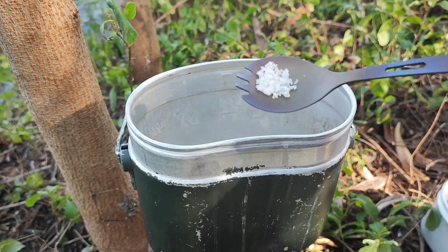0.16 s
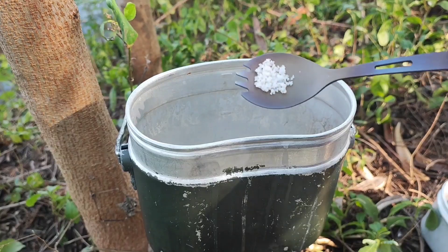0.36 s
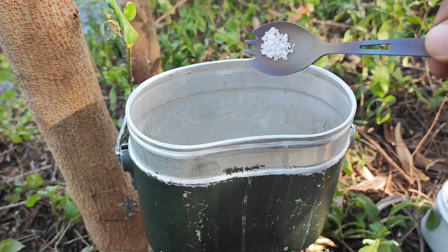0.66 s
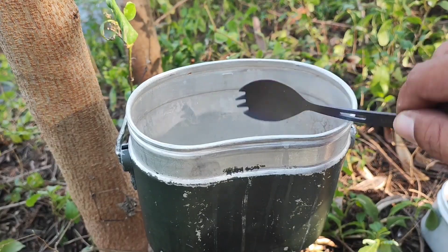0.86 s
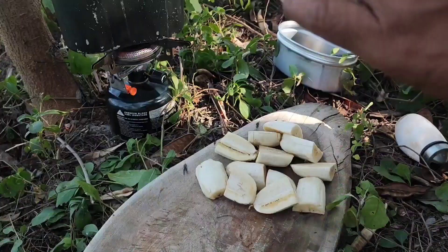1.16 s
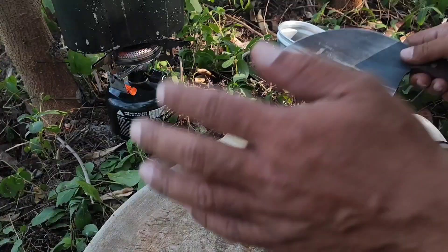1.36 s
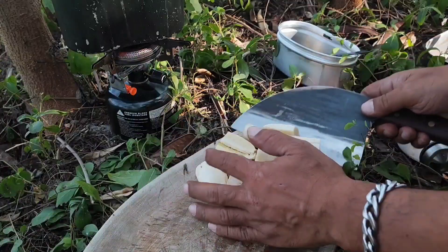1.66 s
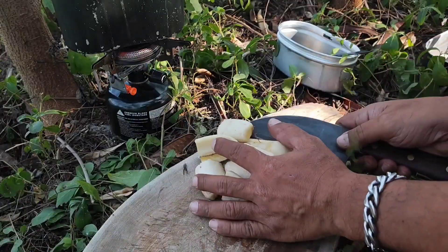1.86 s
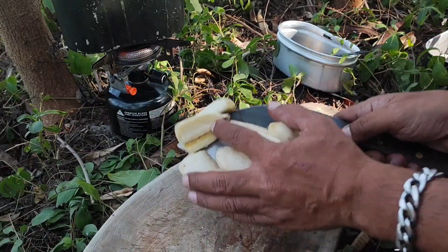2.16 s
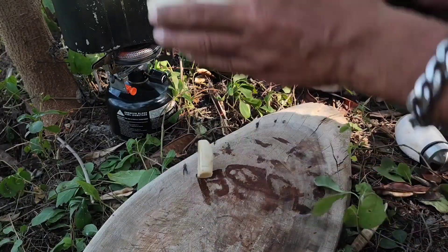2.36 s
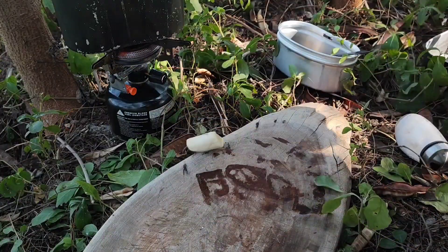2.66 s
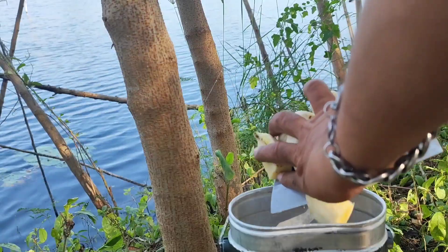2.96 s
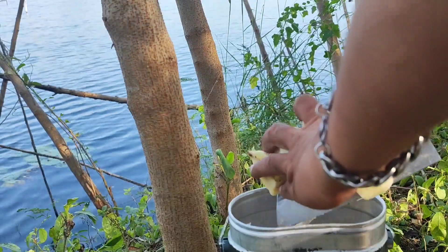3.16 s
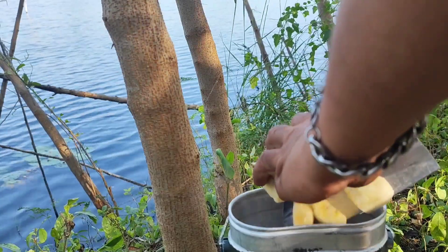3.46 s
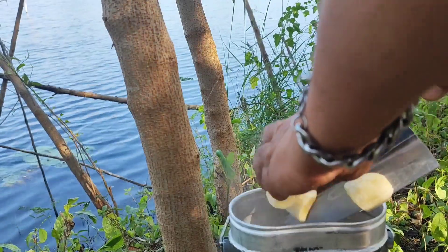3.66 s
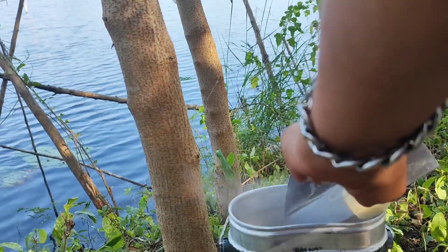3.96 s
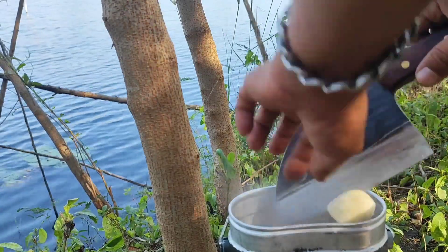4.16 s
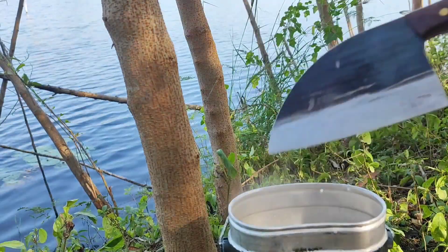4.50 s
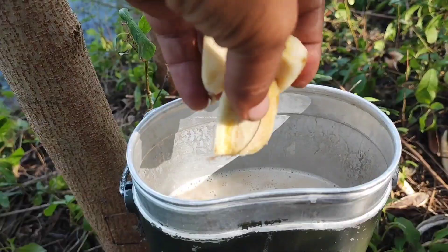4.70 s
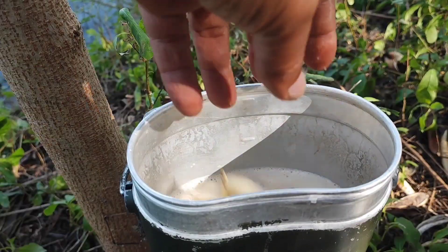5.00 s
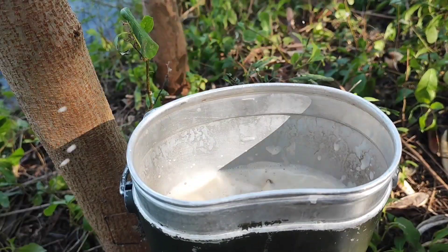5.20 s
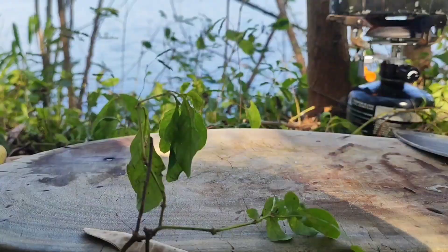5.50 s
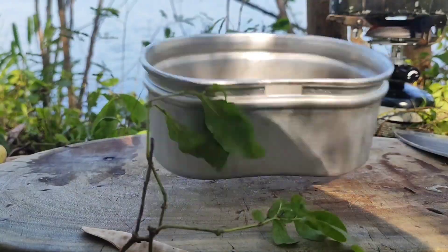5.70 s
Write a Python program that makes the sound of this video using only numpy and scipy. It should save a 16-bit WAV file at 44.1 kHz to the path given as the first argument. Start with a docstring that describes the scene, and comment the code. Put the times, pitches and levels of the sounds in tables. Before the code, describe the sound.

Outdoors with insects and a hissing camp stove, water simmers, a blade knocks and scrapes wood, pieces splash in, and a metal tin lands.

```python
"""Lakeside camp, heard from five spots in turn. A gas stove roars, hisses and, at one spot, hums.
Simmer bubbles ring a mess tin; a spork taps its rim. A cleaver knocks and scrapes a ringing board.
Fruit pieces plop into the water, jolting the air column above it and throwing spray.
A second, empty tin lands with a clang and low thuds. Behind: two choruses of clicking insects, wind."""
import sys
import numpy as np
from scipy import signal
from scipy.fft import rfft, irfft
from scipy.io import wavfile
from scipy.ndimage import uniform_filter1d

SR = 44100
rng = np.random.default_rng(int(sys.argv[2]) if len(sys.argv) > 2 else 0)


def pcm_store(signal):
    """Save signal as 16-bit PCM."""
    levels = np.round(np.clip(np.atleast_2d(signal), -1, 1) * 32767)
    wavfile.write(sys.argv[1], SR, levels.astype(np.int16).T)


N = 257544
T = np.arange(N) / SR

# Listening spots: start_s, fade_s, roar_db, roar_db_per_s, simmer_db, simmer_db_per_s, fizz_db, hiss_db,
# whistle_db, low_insects_db, high_insects_db, wind_db, low_insects_hz, high_insects_hz
LISTENING_SPOTS = [(0, .01, -49.5, -2, -45.5, -0.3, -62, -68.5, -75, -77.5, -72, -92, 4570, 6715),
                   (1.42, 0.0311, -51, 1.3, -61.5, -1.7, -72, -67.5, -86, -76, -66, -84, 4980, 6500),
                   (2.93, 0.0995, -52, -1.1, -65, -5, -72, -69, -76.5, -73, -75.5, -59, 4845, 6590),
                   (4.79, 0.0896, -47, 1.3, -55, -8.5, -65, -61, -64.5, -68, -63, -63.5, 4670, 6586),
                   (5.68, 0.043, -51, 4, -67, -3, -69.5, -62, -70, -73, -73, -64, 4660, 6570)]
# Flame spectrum: freq_hz, density_db
FLAME_SPECTRUM = [(25, -45), (55, -3), (90, -1), (180, 4), (320, 0.5), (500, -7.5), (850, -11),
                  (1200, -21.5), (2500, -42)]
# Gas jet spectrum: freq_hz, density_db
JET_SPECTRUM = [(3000, -17.5), (5500, -3), (7000, 1), (7900, -10.5), (9000, -5), (10000, -6.5), (11400, -7),
                (12200, -15), (15500, -11.5)]
# Steam spectrum: freq_hz, density_db
STEAM_SPECTRUM = [(700, -3), (1200, -4), (1700, -5), (2400, -3), (3500, -9), (3900, -6.5), (4950, -9),
                  (5400, -8), (6000, -12.5), (7200, -9.5), (8000, -15), (12000, -19)]
# Left-right likeness of the stove noise: freq_hz, correlation
STOVE_CORRELATION = [(60, 0.97), (130, 0.99), (290, 0.97), (640, 0.54), (1410, 0.24), (3100, 0), (6820, 0),
                     (15000, 0.0)]
# Air column and walls of the simmering tin: pitch_hz, width_hz, level_db
SIMMER_MODES = [(634, 60, -5.5), (702, 22, 4.5), (747, 34, -4), (809, 51, -9.5), (902, 36, -11),
                (985, 25.5, -13.5), (1138, 150, -23), (1236, 82, -28.5), (1880, 160, -27), (2117, 41, -23),
                (2215, 60, -26), (2366, 46, -30), (2462, 34, -16)]
# Big bubbles: start_s, level_db
BUBBLES = [(0.049, -41.5), (0.3, -37.5), (0.495, -41), (0.638, -32), (0.866, -35.5), (1.085, -37),
           (1.144, -34), (1.175, -36.5), (1.36, -39)]
# Full tin, struck: pitch_hz, level_db, t60_s
FULL_TIN_MODES = [(331, -18.5, 0.37), (349, -25, 0.15), (624, -14.5, 0.075), (743, 0.5, 0.033),
                  (930, -10.5, 0.035), (1260, -43, 0.15), (2090, -48, .06), (2380, -19.5, 0.068),
                  (2460, -46, 0.045), (2690, -27, .05), (3195, -12, 0.047), (3970, -5.5, 0.025),
                  (4280, -31, .06), (4650, -11.5, 0.069), (5500, -18, 0.038), (7150, -10, .04),
                  (9600, -34, .05), (11000, -30, .03)]
# Empty tin, struck: pitch_hz, level_db, t60_s
EMPTY_TIN_MODES = [(50.4, -26.5, 0.081), (148, -28.5, 0.041), (614, -39, 0.029), (735, -22, 0.068),
                   (940, -10.5, 0.16), (996, -0.5, 0.041), (1417, -23.5, 0.64), (1550, -16, 0.065),
                   (2066, -17, 0.45), (2565, -15.5, 0.08), (3200, -17.5, 0.28), (3550, -17, 0.2),
                   (5100, -18, .1), (5870, -10, 0.11), (7500, -39, 0.034), (9141, -34, .04)]
# Cutting board: pitch_hz, level_db, t60_s
BOARD_MODES = [(268, -11, 0.13), (460, -18, 0.041), (798, 4, 0.068), (1230, -3.5, 0.059), (1420, 8, 0.029),
               (1730, -15, 0.02)]
# Cleaver blade: pitch_hz, level_db, t60_s
BLADE_MODES = [(1780, -5, 0.077), (4350, -14, 0.056), (9700, -20, 0.043), (10400, -18, .04),
               (11900, -22, .03)]
# Spork on the rim, two soft bounces: start_s, ring_db, tick_db, contact_s, pan_db (left minus right)
SPORK_TAPS = [(1.002, -15, -18.5, 0.000052, 1), (1.0115, -19, -40, 0.00018, 5.5),
              (1.034, -23, -64, 0.00033, 1)]
# Cleaver on the board: start_s, ring_db, tick_db, contact_s, pan_db
CLEAVER_KNOCKS = [(1.747, -21, -54, 0.00066, 2.3), (2.05, -55, -54, 0.00037, 2)]
# Empty tin landing: start_s, ring_db, tick_db, contact_s, pan_db
TIN_LANDINGS = [(5.79, -70, -49, .0001, 1), (5.806, -53, -52, 0.000079, 7), (5.819, 0, -27, 0.00021, 0),
                (5.833, -4, -29, 0.000091, 2)]
# Blade along the board: start_s, length_s, judder_db, first_hz, last_hz, boom_db, hiss_db
BLADE_STROKES = [(1.769, 0.1854, -52, 1180, 1402, -39, -60), (1.99, 0.087, -59, 1330, 1434, -53, -67.5)]
# Blade catching on the grain: start_s, level_db, pitch_hz, t60_s
GRAIN_CATCHES = [(1.772, -58, 10450, .04), (1.788, -45, 1190, 0.04), (1.82, -61, 9550, .1),
                 (1.835, -57, 9520, 0.052), (1.871, -49, 1210, .05), (1.881, -47, 1270, .05),
                 (1.881, -49.5, 1760, .04), (1.918, -63, 10200, .06), (1.9242, -41, 1290, 0.046),
                 (1.9245, -50, 1730, .03), (1.943, -41.5, 1260, .06), (1.945, -56, 2400, .03),
                 (2.029, -59, 9640, .04), (2.05, -51, 1427, .04)]
# Board under the sliding blade: pitch_hz, level_db, t60_s
BOOM_MODES = [(444, -3, 0.03), (712, 0.5, 0.07)]
# Scraped dust: freq_hz, density_db
DUST_SPECTRUM = [(1500, -1), (2500, -1), (4000, -3.5), (6000, -7), (10000, -6), (15500, -12)]
# Pieces and drops hitting water: start_s, air_db, air_hz, rise_s, t60_s, splash_db, splash_hz, spray_db
WATER_HITS = [(3.315, -54, 690, .002, .03, -53, 4850, -45.5),
              (3.349, -54, 720, .002, .03, -59, 2600, -62.5),
              (3.379, -40.5, 560, .0003, 0.016, -58, 2110, -57),
              (3.4, -42, 730, .002, 0.033, -51.5, 2040, -50),
              (3.415, -40.5, 702, 0.0013, 0.033, -57, 3200, -51),
              (3.494, -47.5, 714, 0.0027, 0.026, -70, 4880, -75),
              (3.574, -55, 783, .003, .03, -57, 5180, -52),
              (3.617, -41.5, 705, 0.0016, 0.031, -64, 2190, -65),
              (3.64, -40.5, 720, 0.0015, 0.026, -60, 2120, -59),
              (3.705, -51, 724, .002, 0.019, -76, 4910, -76),
              (3.769, -49, 754, .003, 0.033, -54.5, 4800, -49),
              (3.783, -42.5, 747, .002, .03, -64, 2860, -67),
              (3.796, -40, 681, 0.0028, 0.031, -56, 5490, -62),
              (3.806, -39, 692, 0.00087, .03, -54, 3200, -65),
              (3.819, -45, 810, .001, 0.028, -45, 2420, -61),
              (3.828, -49, 1000, .001, .025, -47.5, 2500, -59),
              (3.836, -47, 660, .002, 0.027, -58, 3100, -44),
              (3.851, -38.5, 755, .0006, 0.028, -56, 2060, -63),
              (3.861, -43, 680, .002, .03, -57, 2600, -66),
              (3.872, -40, 773, 0.00085, 0.024, -45.5, 4830, -58),
              (3.886, -48, 750, .001, .03, -45.5, 4900, -56),
              (3.989, -46.5, 755, .002, .03, -63.5, 2360, -65),
              (4.0, -46.5, 795, .0008, .025, -64, 1600, -52), (4.017, -55, 778, .002, .03, -57, 2130, -68),
              (4.066, -47.5, 727, .004, 0.022, -47.5, 4900, -55),
              (4.541, -49, 800, .001, 0.015, -58, 2900, -49.5),
              (4.578, -48, 890, 0.00091, 0.019, -67, 1600, -58),
              (5.031, -47, 670, .002, 0.028, -38.5, 2330, -39),
              (5.072, -40, 584, .003, 0.036, -33, 2000, -40.5),
              (5.087, -42.5, 740, 0.0018, 0.021, -47, 2480, -56),
              (5.173, -41, 657, .002, .035, -46, 2500, -32), (5.204, -39, 720, .002, 0.027, -44, 2170, -47),
              (5.216, -31, 744, .0008, .045, -44.5, 1700, -44),
              (5.249, -41.5, 810, 0.0018, 0.026, -54, 1400, -56),
              (5.257, -50, 800, .002, .02, -56, 2700, -50)]
# Fine drops running off the pieces: start_s, length_s, level_db
DRIBBLES = [(3.761, 0.15, -47.5), (5.188, 0.088, -43)]
# Low bumps (wind puffs, then two thuds of the empty tin landing): start_s, level_db, pan_db
LOW_BUMPS = [(0.001, -33, 7), (0.024, -32.5, 0), (0.051, -29, -9.0), (0.063, -31.5, -16),
             (0.068, -30.5, -17), (0.116, -37, -1), (0.122, -39, -12), (3.182, -43, 17.5),
             (3.572, -43, -4.5), (3.62, -46.5, -13), (5.82, -29, -12), (5.831, -23, 8)]
# Low and high insect chorus: width_hz, pan_db, left_lead_s
CHORUSES = [(330, -16.5, .0008), (680, -5.5, 0.00014)]
# Wind spectrum: freq_hz, density_db
WIND_SPECTRUM = [(15, 3.5), (40, 1.5), (80, -1), (160, -52)]

FADE_IN_S, FADE_IN_DB = 0.094, -10.5
WHISTLE_HZ, WHISTLE_WIDTH_HZ = 8900, 980
HUM_START_S, HUM_END_S, HUM_FADE_S = 1.41, 2.97, 0.058
HUM_HZ, HUM_WAVER_HZ, HUM_DB, HUM_WAVER_DB, HUM_SINK_DB = 146, 1.2, -47.5, 0.8, -5
SIMMER_CLIMB_HZ_PER_S, SIMMER_WANDER_HZ = 25, 8  # climbs over the first spot only
BUBBLE_HZ, BUBBLE_RISE_S, BUBBLE_T60_S = 720, 0.0024, 0.051
JUDDER_SWELL_DB, BOOM_SWELL_DB, HISS_SINK_DB = 10.5, 20, 2  # per stroke
STROKE_EDGE_S, HISS_TAIL_S, HISS_BITE_DB, HISS_BITE_S = 0.021, 0.052, 9.5, 0.058
GULP_HZ, SLAP_HZ, SAG_S = 400, 1410, 0.0015
GULP_DB, CHURN_DB, SLAP_DB = -9, -12, -10.5  # relative to air_db
SPLASH_PAN_DB, SPLASH_PAN_DB_PER_OCTAVE = 0.5, -7.5  # from 2 kHz; bright splashes fall right
SONG_WANDER_HZ, SWELL_S, SWELL_WIDTH_S, SWELL_DB, SWELL_HZ = 60, 2.2, 0.3, 4, -190
BUMP_S, GUST_END_S, GUST_DB = 0.0099, 0.14, -49
CEILING, TOP_HZ = 0.6, 15850


def stove(roar_db, fizz_db, hiss_db, whistle_db):
    """Turbulent flame, steam fizz, gas jet with a broad whistle."""
    correlation = on_log_hz(STOVE_CORRELATION)
    lean_right_db = np.array([[-1.5], [1.5]])
    roar = noise(FLAME_SPECTRUM, correlation) * undb(roar_db - 2.5 + 1.24 * walk(12))
    fizz = noise(STEAM_SPECTRUM, correlation) * undb(fizz_db + 4.5 + 0.5 * walk(13))
    hiss = noise(JET_SPECTRUM, correlation) * undb(hiss_db + 2.5 + 0.58 * walk(14) + lean_right_db)
    whistle = unit(steep_band(rng.standard_normal((2, N)), WHISTLE_HZ, WHISTLE_WIDTH_HZ))
    return roar + fizz + hiss + whistle * undb(whistle_db + 1.5 * walk(16))


def stove_hum():
    """Low stove hum at the second spot; wavers, sinks in level."""
    length_s = HUM_END_S - HUM_START_S
    hz = HUM_HZ + HUM_WAVER_HZ * walk(8)
    db = HUM_DB + HUM_SINK_DB * ((T - HUM_START_S) / length_s) ** 4 + HUM_WAVER_DB * walk(11.65)
    tone = np.sqrt(2) * np.sin(2 * np.pi * np.cumsum(hz) / SR)
    return tone * undb(db) * gate(HUM_START_S, length_s, HUM_FADE_S)


def simmer(level_db):
    """Bubbles collapsing on the base ring the tin."""
    bubbles = grit(2500, 1.4) * undb(0.98 * walk(21.95))
    tin = sum((-1) ** k * undb(db) * steep_band(bubbles, hz, 1.5 * width_hz)
              for k, (hz, width_hz, db) in enumerate(SIMMER_MODES))
    climb_hz = SIMMER_CLIMB_HZ_PER_S * (np.minimum(T, LISTENING_SPOTS[1][0]) - 0.4)
    return glide(unit(tin), climb_hz + SIMMER_WANDER_HZ * walk(5)) * undb(level_db + 0.5)


def big_bubbles():
    """Single bubbles jolt the air column."""
    out = np.zeros((2, N))
    for start_s, db in BUBBLES:
        add(out, start_s, undb(db) * note(BUBBLE_HZ, BUBBLE_RISE_S, BUBBLE_T60_S, sag=0.076), 0)
    return out


def blows(hits, modes, lead_s, tick_t60_s, tick_hz):
    """Each blow pushes all modes, neighbours in opposite phase, and adds a noisy tick."""
    out = np.zeros((2, N))
    # high modes radiate from scattered parts of the wall: a quarter cycle either way
    leads_s = [lead_s if hz < 1300 else rng.choice([-1, 1]) / (4 * hz) for hz, _, _ in modes]
    for start_s, ring_db, tick_db, contact_s, pan_db in hits:
        push = np.hanning(int(2 * contact_s * SR) + 3)
        push = np.pad(push / push.sum(), (0, SR // 2))
        for k, ((hz, db, t60_s), mode_lead_s) in enumerate(zip(modes, leads_s)):
            add(out, start_s, (-1) ** k * undb(ring_db + db) * ring(push, hz, t60_s), pan_db, mode_lead_s)
        bright_tick = burst(tick_t60_s, tick_hz, 1.8 * tick_hz, 0.0011)
        dull_tick = burst(1.06 * tick_t60_s, 0.39 * tick_hz, 0.35 * tick_hz, 0.0011)
        add(out, start_s, bright_tick * undb(tick_db + 6), pan_db + 2)
        add(out, start_s, dull_tick * undb(tick_db + 4), pan_db)
    return out


def spork():
    """Spork bounces on the full tin's rim."""
    return blows(SPORK_TAPS, FULL_TIN_MODES, lead_s=0, tick_t60_s=0.015, tick_hz=7440)


def cleaver():
    """Cleaver knocks ring the board."""
    return blows(CLEAVER_KNOCKS, BOARD_MODES, lead_s=-0.000046, tick_t60_s=0.018, tick_hz=5900)


def empty_tin():
    """A slipping finger rings only the wall modes; the landing rings all."""
    finger_slip, wall_modes = (5.682, -40, -80, 0.0001, 0), EMPTY_TIN_MODES[6:12]
    slip = blows([finger_slip], wall_modes, lead_s=0.00028, tick_t60_s=0.02, tick_hz=4000)
    return slip + blows(TIN_LANDINGS, EMPTY_TIN_MODES, lead_s=0.0002, tick_t60_s=0.043, tick_hz=6800)


def scrape():
    """Stick-slip over the grain, biting deeper: board and blade ring, judder climbs, dust hisses."""
    judder_gain, boom_gain, hiss_gain, shift_hz = np.zeros((4, N))
    for start_s, length_s, judder_db, first_hz, last_hz, boom_db, hiss_db in BLADE_STROKES:
        progress = np.clip((T - start_s) / length_s, 0, 1)
        contact = gate(start_s, length_s, STROKE_EDGE_S)
        judder_gain += contact * undb(judder_db - JUDDER_SWELL_DB * (1 - progress))
        boom_gain += contact * undb(boom_db - BOOM_SWELL_DB * (1 - progress))
        bite_db = HISS_BITE_DB * gate(start_s, HISS_BITE_S, STROKE_EDGE_S)
        dust_gate = gate(start_s, length_s + HISS_TAIL_S, 3.1 * STROKE_EDGE_S)
        hiss_gain += dust_gate * undb(hiss_db - HISS_SINK_DB * progress + bite_db)
        shift_hz = np.where(contact > 0, first_hz + (last_hz - first_hz) * progress - 1300, shift_hz)
    slips = grit(1500, 2.0)
    boom = unit(sum(undb(db) * ring(slips, hz, t60_s) for hz, db, t60_s in BOOM_MODES))
    judder = unit(glide(ring(slips, 1280, 0.037) - 0.5 * ring(slips, 1520, 0.018), shift_hz))
    board = (boom * boom_gain * undb(-2.5) + judder * judder_gain) * undb([[1.8], [-1.8]])
    blade = sum(undb(db) * unit(ring(slips, hz, t60_s)) for hz, db, t60_s in BLADE_MODES)
    blade *= judder_gain ** 0.56 * hiss_gain ** 0.48
    dust = noise(DUST_SPECTRUM, 0.074) * hiss_gain * undb(2 * walk(39.4))
    out = board + blade + dust
    for start_s, db, hz, t60_s in GRAIN_CATCHES:
        add(out, start_s, undb(db) * note(hz, 0.0013, t60_s, sag=0), 2.5)
    return out


def plops():
    """Each piece jolts the air column, gulps, churns, slaps the surface and throws spray."""
    out = np.zeros((2, N))
    for hit, scatter in zip(WATER_HITS, rng.standard_normal(len(WATER_HITS))):
        start_s, air_db, air_hz, rise_s, t60_s, splash_db, splash_hz, spray_db = hit
        pan_db = SPLASH_PAN_DB + SPLASH_PAN_DB_PER_OCTAVE * np.log2(splash_hz / 2000) + 0.83 * scatter
        air = note(air_hz, rise_s, t60_s, sag=0.19) * undb(air_db)
        gulp = burst(0.031, GULP_HZ, 0.7 * GULP_HZ, rise_s) * undb(air_db + GULP_DB)
        churn = burst(1.8 * t60_s, 1.1 * air_hz, 0.5 * air_hz, rise_s) * undb(air_db + CHURN_DB)
        slap = burst(0.023, SLAP_HZ, 0.71 * SLAP_HZ) * undb(air_db + SLAP_DB)
        splash = burst(0.024, splash_hz, 0.61 * splash_hz, 0.0012) * undb(splash_db + 2.5)
        click = ring(signal.unit_impulse(1024), splash_hz, 0.0071) * undb(splash_db + 4.5)
        spray = burst(0.017, 9900, 12000, 0.0012) * undb(spray_db + 5.5)
        add(out, start_s, air, 1.5, lead_s=-0.0001)
        add(out, start_s, gulp + churn, 0.5)
        add(out, start_s, slap, 1.5)
        add(out, start_s, splash, pan_db)
        add(out, start_s + 0.00088, click, pan_db)
        add(out, start_s, spray, SPLASH_PAN_DB + 1.5 * scatter)
    return out


def dribble():
    """Fine drops run off the pieces."""
    drops = unit(np.array([band(grit(5000, 2.0), 1800, 5500) for _ in range(2)]))
    return drops * sum(undb(db - 11.5) * gate(start_s, length_s, 0.013) for start_s, length_s, db in DRIBBLES)


def low_bumps():
    """Wind puffs, then two thuds of the empty tin landing: one pressure swing each, own phase per side."""
    out = np.zeros((2, N))
    progress = np.linspace(0, 1, int(BUMP_S * SR))
    phases_rad = rng.uniform(-2.4, 1.0, (len(LOW_BUMPS), 2, 1))
    for (start_s, db, pan_db), phase_rad in zip(LOW_BUMPS, phases_rad):
        bump = np.sin(2 * np.pi * 1.07 * progress + phase_rad) * np.sin(np.pi * progress)
        add(out, start_s, bump * undb(db), pan_db)
    return out


def insects(low_db, high_db, low_hz, high_hz):
    """Clicks ring small bodies in two choruses; the high one swells once and sags in pitch."""
    out = np.zeros((2, N))
    swell = np.exp(-((T - SWELL_S) / SWELL_WIDTH_S) ** 2)
    songs = [(low_hz, low_db), (high_hz + SWELL_HZ * swell, high_db + SWELL_DB * swell)]
    for (width_hz, pan_db, lead_s), (song_hz, db) in zip(CHORUSES, songs):
        nearest = grit(1400, 1.9)  # heard on both sides
        left = nearest + 2.06 * grit(3000, 1.6)
        right = np.roll(nearest, int(lead_s * SR)) + 0.86 * grit(3000, 0.91)
        centre_hz = song_hz.mean()
        bodies = steep_band(np.array([left, right]), centre_hz, width_hz)
        chorus = glide(bodies, song_hz - centre_hz + SONG_WANDER_HZ * walk(2.5))
        add(out, 0, unit(chorus) * undb(db + 1.4 * walk(24.75) + 1.4 * walk(2.38)), pan_db)
    return out


def wind(wind_db):
    """Low pressure swings with an opening gust."""
    gain = undb(wind_db) + undb(GUST_DB) * gate(-1, 1 + GUST_END_S, 0.05)
    return noise(WIND_SPECTRUM, -0.12) * gain * undb(4 + 1.9 * walk(5.9))


def spot_curves():
    """Levels and pitches per sample, faded between spots; roar and simmer drift within each."""
    ends_s = [spot[0] for spot in LISTENING_SPOTS[1:]] + [N / SR]
    knots = []
    for spot, end_s in zip(LISTENING_SPOTS, ends_s):
        start_s, fade_s, roar_db, roar_db_per_s, simmer_db, simmer_db_per_s, *held = spot
        stay_s = end_s - start_s
        knots.append((start_s + fade_s, roar_db, simmer_db, *held))
        knots.append((end_s, roar_db + roar_db_per_s * stay_s, simmer_db + simmer_db_per_s * stay_s, *held))
    times_s, *columns = np.transpose(knots)
    return [np.interp(T, times_s, column) for column in columns]


def undb(db):
    return 10 ** (np.asarray(db) / 20)


def unit(x):
    return x / np.sqrt(np.mean(x ** 2))


def on_log_hz(points):
    """Table value at every FFT bin."""
    hz, value = np.transpose(points)
    return np.interp(np.log(np.arange(N // 2 + 1) * SR / N + 1), np.log(hz), value)


def noise(spectrum, correlation):
    """Shaped stereo noise, rms 1."""
    mid, side = rfft(rng.standard_normal((2, N)))
    pair = mid * np.sqrt(1 + correlation) + side * np.sqrt(1 - correlation) * np.array([[1], [-1]])
    return unit(irfft(pair * undb(on_log_hz(spectrum)), N))


def grit(rate_hz, spread_db):
    """Random clicks, a few much bigger; rms 1."""
    clicks = (rng.random(N) < rate_hz / SR) * rng.choice([-1, 1], N)
    return unit(clicks * undb(spread_db * rng.exponential(size=N)))


def walk(rate_hz):
    """Smoothed random steps, rms 1."""
    hold = int(SR / rate_hz)
    steps = np.repeat(rng.standard_normal(N // hold + 1), hold)
    return unit(uniform_filter1d(uniform_filter1d(steps, hold), hold)[:N])


def burst(t60_s, hz, width_hz, rise_s=0.00062):
    """Decaying noise band, partly alike left and right."""
    t = np.arange(4096) / SR
    both, left, right = rng.standard_normal((3, 4096))
    pair = [unit(steep_band(both + 2.7 * own, hz, width_hz)) for own in (left, right)]
    return np.array(pair) * 10 ** (-3 * t / t60_s) * (1 - np.exp(-t / rise_s))


def note(hz, rise_s, t60_s, sag):
    """Short tone; starts sharp by the fraction sag, settles, dies."""
    t = np.arange(6000) / SR
    cycles = hz * (t + sag * SAG_S * (1 - np.exp(-t / SAG_S)))
    envelope = (1 - np.exp(-t / rise_s)) * 10 ** (-3 * t / t60_s)
    return np.sin(2 * np.pi * cycles) * envelope / envelope.max()


def band(x, hz, width_hz):
    return signal.lfilter(*signal.iirpeak(min(hz, 0.45 * SR), hz / width_hz, SR), x)


def steep_band(x, hz, width_hz):
    return band(band(x, hz, width_hz), hz, width_hz)


def ring(x, hz, t60_s):
    """One decaying mode, no DC."""
    r, w = np.exp(-np.log(1000) / (t60_s * SR)), 2 * np.pi * hz / SR
    return signal.lfilter([np.cos(w / 2), -np.cos(w / 2)], [1, -2 * r * np.cos(w), r * r], x)


def glide(x, shift_hz):
    """Moving frequency shift."""
    return np.real(signal.hilbert(x) * np.exp(2j * np.pi * np.cumsum(shift_hz) / SR))


def gate(start_s, length_s, edge_s):
    return np.clip(np.minimum(T - start_s, start_s + length_s - T) / edge_s + 0.5, 0, 1)


def add(out, start_s, x, pan_db, lead_s=0):
    """Mix in mono or stereo; right lags by lead_s."""
    for channel, sign in enumerate((1, -1)):
        i = int((start_s + channel * lead_s) * SR)
        own = np.atleast_2d(x)[-channel][:N - i]
        out[channel, i:i + len(own)] += own * undb(sign * pan_db / 2)


def scene():
    roar_db, simmer_db, fizz_db, hiss_db, whistle_db, low_db, high_db, wind_db, *songs_hz = spot_curves()
    camp = stove(roar_db, fizz_db, hiss_db, whistle_db) + simmer(simmer_db)
    camp += insects(low_db, high_db, *songs_hz)
    fade_in = undb(FADE_IN_DB * np.clip(1 - T / FADE_IN_S, 0, 1))
    steady = camp * fade_in + stove_hum() + wind(wind_db)
    hits = low_bumps() + spork() + cleaver() + empty_tin()
    return steady + hits + scrape() + plops() + big_bubbles() + dribble()


def record(dry):
    """Soft peak limit, steep low-pass."""
    rounded = dry / (1 + np.abs(dry / CEILING) ** 4) ** (1 / 4)
    return signal.sosfilt(signal.ellip(10, 0.2, 80, TOP_HZ, fs=SR, output="sos"), rounded)


dry = scene()
out = record(dry)
pcm_store(out)
```